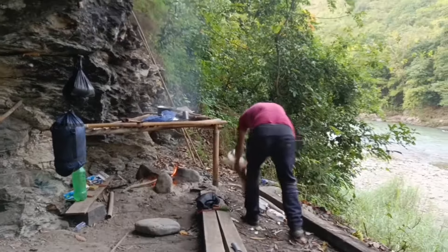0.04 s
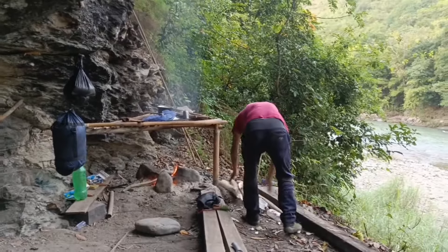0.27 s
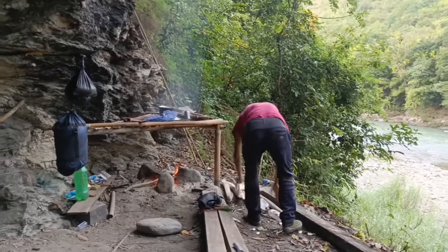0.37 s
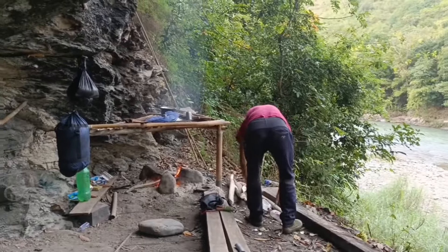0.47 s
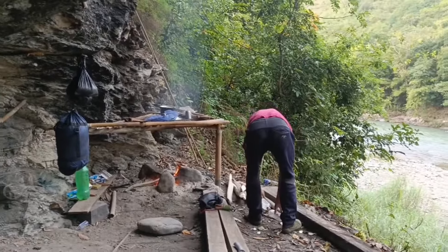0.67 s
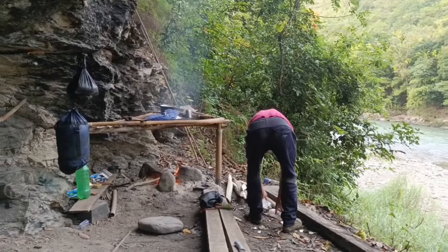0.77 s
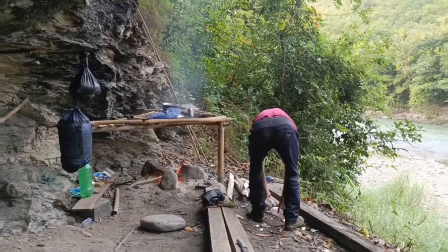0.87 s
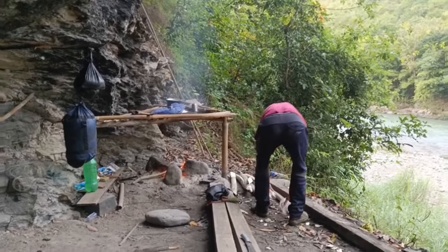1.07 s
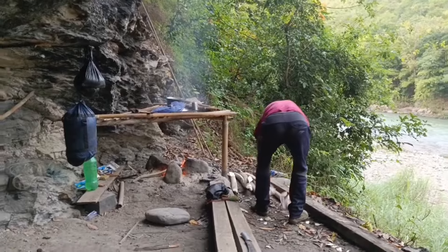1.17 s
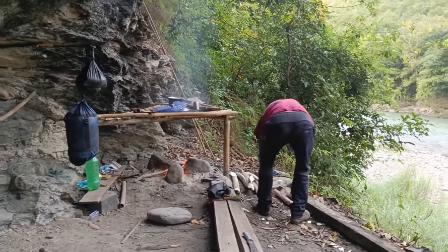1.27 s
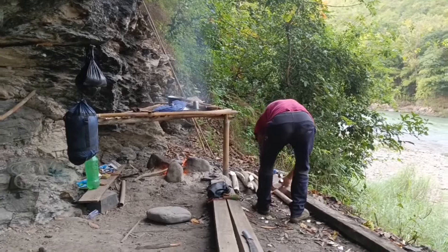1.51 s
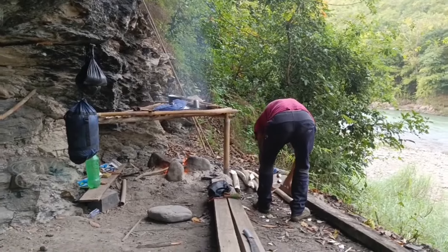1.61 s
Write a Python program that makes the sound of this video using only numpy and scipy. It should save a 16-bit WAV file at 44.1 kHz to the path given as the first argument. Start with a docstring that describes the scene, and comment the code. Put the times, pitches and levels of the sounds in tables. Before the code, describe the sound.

Wood clatters on wood near the start, one soft bump followed by rapid resonant knocks with cracks and low ground thuds, settling quickly. Afterwards mostly even river rush, under a rock overhang, heard by one microphone.

```python
"""A length of wood comes down on a firewood pile under a rock overhang beside a river.
The river, coloured noise, rushes steadily throughout. A dull bump of the pile comes first, as damped modes.
Then the wood knocks hard, rebounds and rattles to rest; it and the log beneath ring as two sets of modes,
with noise bursts for cracks and ground thuds. More soft bumps and splinter ticks fall among and after these.
The rock returns a short echo of each wood sound, by convolution with decaying noise."""
import sys
import numpy as np
from scipy import signal
from scipy.fft import rfft, irfft
from scipy.io import wavfile
from scipy.ndimage import uniform_filter1d

SR = 44100
rng = np.random.default_rng(int(sys.argv[2]) if len(sys.argv) > 2 else 0)


def to_wav(sig):
    """Store sig (one row per channel, or 1-D mono) as 16-bit WAV at the path in sys.argv[1].

    Samples outside -1..1 are clipped; the rate is SR.
    """
    pcm = np.clip(np.atleast_2d(sig), -1, 1) * 32767
    pcm = np.round(pcm).astype(np.int16)
    wavfile.write(sys.argv[1], SR, pcm.T)  # frames by channels


N = 72765
T = np.arange(N) / SR  # t/s
CONTACT_S = 0.0034  # rise time of a blow


def undb(db):
    """Logarithmic level: decibels to amplitude ratio."""
    return 10 ** (np.asarray(db) / 20)


def noise(spectrum):
    """Spectral shaping: white noise filtered to a given colour and scaled to rms 1."""
    hz, db = np.array(spectrum, float).T
    f = np.maximum(np.fft.rfftfreq(N, 1 / SR), 1)
    gain = undb(np.interp(np.log(f), np.log(hz), db))
    x = irfft(rfft(rng.standard_normal(N)) * gain, N)
    return x / x.std()


def fade(start, t60, rise=CONTACT_S):
    """Exponential decay: a blow rises linearly during contact while losing 60 dB per t60."""
    age = np.maximum(T - start, 0)
    attack = np.minimum(age / rise, 1)
    return attack * np.exp(-np.log(1000) * age / t60)


def ring(modes, start, rise, pitch=1, tilt_db=0):
    """Modal superposition: one blow excites damped sines; a harder contact favours the high ones."""
    out = np.zeros(N)
    for hz, db, t60 in modes:
        level_db = db + tilt_db * np.log2(hz / 1000)  # the tilt pivots at 1 kHz
        sine = np.sin(2 * np.pi * hz * pitch * (T - start))
        out += undb(level_db) * fade(start, t60, rise) * sine
    return out


def walk(rate):
    """Smoothed random process: random steps, rate per second, averaged over one step length."""
    step = int(SR / rate)
    steps = np.repeat(rng.standard_normal(N // step + 1), step)
    return uniform_filter1d(steps, step)[:N]


# Colour of the distant rapids: f/Hz, relative level/dB
RIVER_SPECTRUM = [(25, -43), (48, -34), (90, -18), (125, -4), (205, -9), (235, -3), (262, 4), (295, -8.5),
                  (360, -7.5), (490, -4.5), (640, -7.5), (740, -3.5), (820, -7.5), (1400, -8.5),
                  (2200, -12), (3200, -19.5), (4800, -22), (7500, -27.5), (10000, -34), (11500, -42.5),
                  (13500, -41), (15400, -45)]
RIVER_DB, RIVER_FLICKER_DB = -41, 0.5  # mean level, scale of its random wander


def river():
    """Broadband turbulence noise: distant rapids, a smooth rush whose level flickers slightly."""
    level_db = RIVER_DB + RIVER_FLICKER_DB * walk(13.88)
    return noise(RIVER_SPECTRUM) * undb(level_db)


# Colour of the sound scattered by the rock: f/Hz, relative level/dB
ECHO_SPECTRUM = [(80, 2), (400, 0), (1200, -7), (3000, -8), (12000, -1)]
ROCK_DELAY_S, ROCK_T60_S, ROCK_DB = 0.0075, 0.27, -17


def overhang(x):
    """Diffuse reflection: the rough rock's response is delayed, decaying noise of unit energy."""
    response = noise(ECHO_SPECTRUM) * fade(ROCK_DELAY_S, ROCK_T60_S)
    response /= np.linalg.norm(response)
    return undb(ROCK_DB) * signal.fftconvolve(x, response)[:N]


# Soft bumps of the pile on the ground: t/s, level/dB, pitch ratio
PILE_BUMPS = [(0.1685, -19.5, 1.004), (0.399, -31, 1), (0.597, -32, 1.22), (0.642, -33.5, .87),
              (0.828, -34.5, 0.98)]
# Modes of the pile as a whole: f/Hz before the pitch ratio, relative level/dB, t60/s
PILE_MODES = [(284, -9, 0.16), (341, -10, 0.11), (424, -0.5, 0.067), (523, 2, 0.054), (582, -1, 0.13),
              (698, -8, 0.063), (727, -15.5, 0.13), (853, -14, 0.086)]
BUMP_S = 0.002  # rise time


def pile_bumps():
    """Modal excitation by soft impact: the pile bumps dully as the wood shifts."""
    return sum(undb(db) * ring(PILE_MODES, start, BUMP_S, pitch) for start, db, pitch in PILE_BUMPS)


# Splinters and bark snapping: t/s, level/dB, t60/s
SPLINTER_TICKS = [(0.235, -41.5, 0.089), (0.32, -36.5, 0.035), (0.4891, -29, 0.014), (1.408, -43, .015)]
# Colour of a snap: f/Hz, relative level/dB
TICK_SPECTRUM = [(1000, -22), (2800, -23), (4200, 13.5), (6000, 7), (9500, -3), (11800, -14), (14000, -7),
                 (15500, -20)]
SNAP_S = 0.00067  # rise time


def splinter_ticks():
    """Brittle fracture: each snap is a sharp burst of high-pitched noise."""
    return sum(undb(db) * fade(start, t60, SNAP_S) * noise(TICK_SPECTRUM)
               for start, db, t60 in SPLINTER_TICKS)


# Contacts of the two pieces: t/s, swung piece level/dB, log beneath level/dB,
# hardness/(dB per octave), crack level/dB, ground thud level/dB
CONTACTS = [(0.2323, -16.5, -16, 0.5, -23.5, -27), (0.24269, -9, -46, 2, -19, -31.5),
            (0.2511, -19, -24, 7.5, -20.5, -52), (0.27426, -21.5, -11, 3, -20.5, -33),
            (0.27883, -45, -9, 3, -18, -57), (0.29299, -16.5, -21, 6, -29, -40),
            (0.29975, -22, -17.5, -7.5, -35, -38), (0.3117, -18.5, -16, -3, -26.5, -59),
            (0.31926, -20.5, -29, -4.5, -33, -26), (0.41667, -27.5, -38, 1, -42, -36),
            (0.43814, -29.5, -35, -0.5, -40.5, -50), (0.44892, -40, -34.5, 4.5, -60, -47),
            (0.51403, -30, -52, -8.5, -50, -45)]
# Modes of the swung piece: f/Hz, relative level/dB, t60/s
SWUNG_MODES = [(516, -11.5, 0.1), (945.6, -7, 0.13), (970.5, -2.5, .21), (1140, -40, 0.026),
               (1621, -0.5, 0.11), (1687, -8.5, 0.14), (1814, -9.5, 0.084), (2117, -5, 0.044),
               (2230, -13.5, 0.082)]
# Modes of the log beneath: f/Hz, relative level/dB, t60/s
LOG_MODES = [(479.7, -10, 0.25), (649, -8.5, 0.091), (841, -13.5, 0.24), (906, -11, 0.18),
             (1052, 7.5, 0.039), (1116, -6.5, 0.094), (1145.7, -5, 0.18), (1320, -17, 0.12),
             (1474, -4, 0.046), (1507, -6.5, 0.086), (2146, -21, 0.14)]
# Colour of the cracking fibres: f/Hz, relative level/dB
CRACK_SPECTRUM = [(150, -41), (400, -5), (1000, -2), (2200, 2), (2800, -9), (4200, -10), (7000, -21.5),
                  (10000, -28), (11700, -36), (14000, -34)]
# Colour of the thud into the ground: f/Hz, relative level/dB
THUD_SPECTRUM = [(25, -52), (70, -18), (130, 0.5), (200, 5.5), (320, -1), (700, -27), (2000, -66)]
CRACK_T60_S, THUD_T60_S = 0.11, 0.13
GROUND_GIVE_S = 0.004  # rise time of the thud


def knocks():
    """Impact excitation: each contact rings both pieces, cracks rough fibres and thuds into the ground."""
    out = np.zeros(N)
    for start, swung_db, log_db, hard_db, crack_db, thud_db in CONTACTS:
        out += undb(swung_db) * ring(SWUNG_MODES, start, CONTACT_S, tilt_db=hard_db)
        out += undb(log_db) * ring(LOG_MODES, start, CONTACT_S, tilt_db=hard_db)
        out += undb(crack_db) * fade(start, CRACK_T60_S) * noise(CRACK_SPECTRUM)
        out += undb(thud_db) * fade(start, THUD_T60_S, GROUND_GIVE_S) * noise(THUD_SPECTRUM)
    return out


def scene():
    """Linear superposition: river, wood and the wood's echo add at one microphone."""
    water = river()
    wood = knocks() + pile_bumps() + splinter_ticks()
    return (water + wood + overhang(wood))[None]


TOP_HZ = 15300  # upper band limit


def record(dry):
    """Saturation and band-limiting: the recorder rounds the highest peaks and cuts the top."""
    rounded = dry / (1 + dry ** 8) ** (1 / 8)
    # 0.1 dB passband ripple, 90 dB stopband attenuation
    low_pass = signal.ellip(10, 0.1, 90, TOP_HZ, fs=SR, output="sos")
    return signal.sosfilt(low_pass, rounded)


dry = scene()
out = record(dry)
to_wav(out)
```